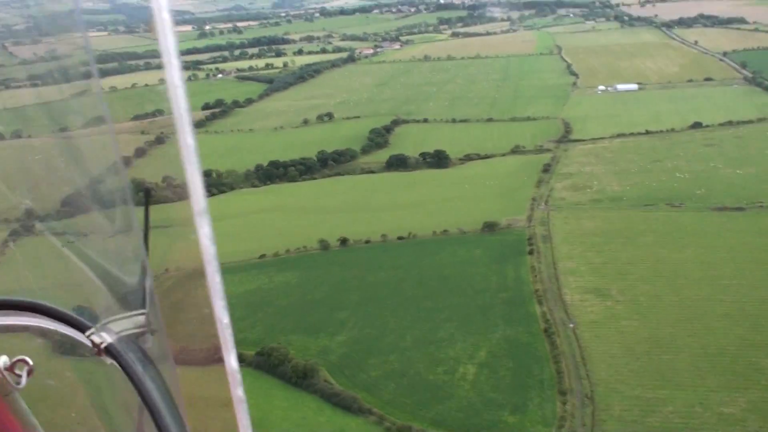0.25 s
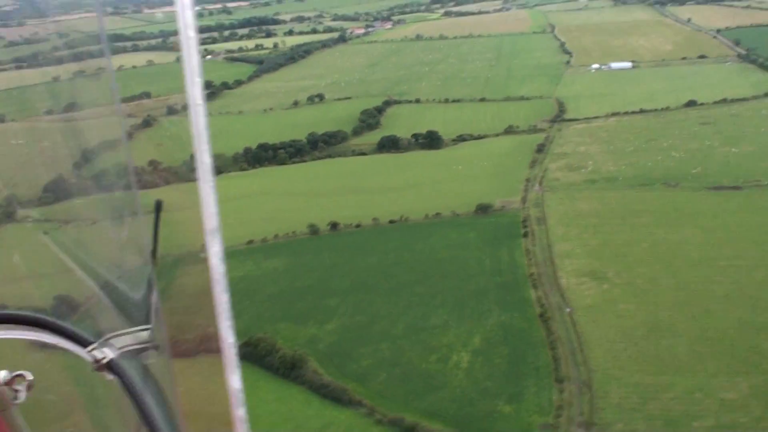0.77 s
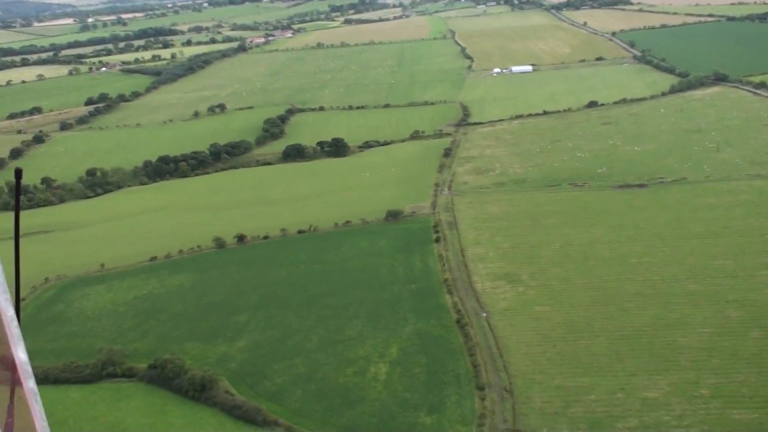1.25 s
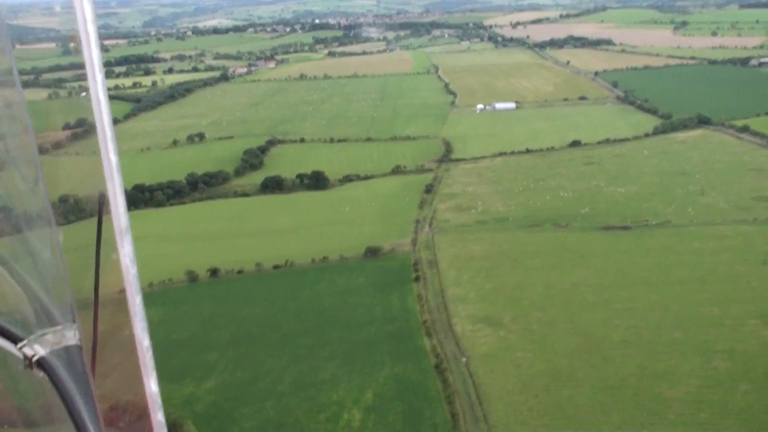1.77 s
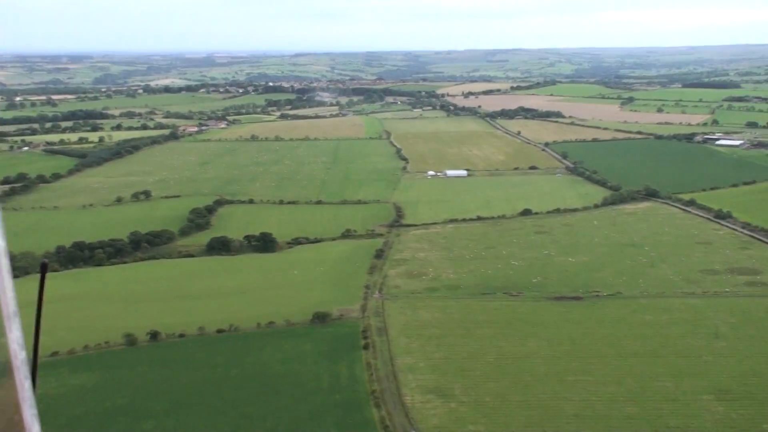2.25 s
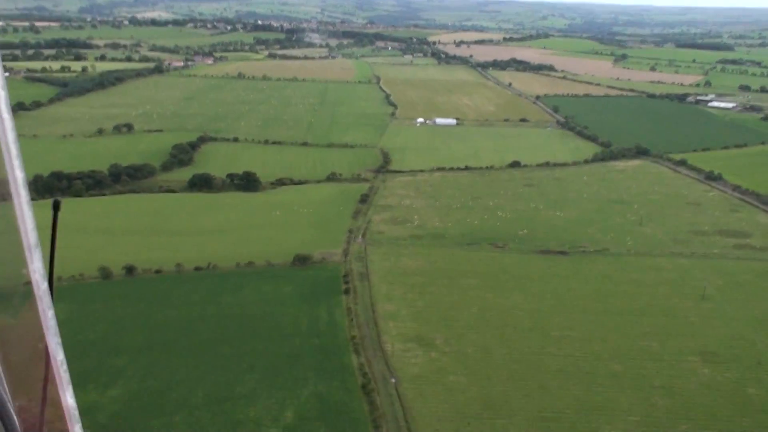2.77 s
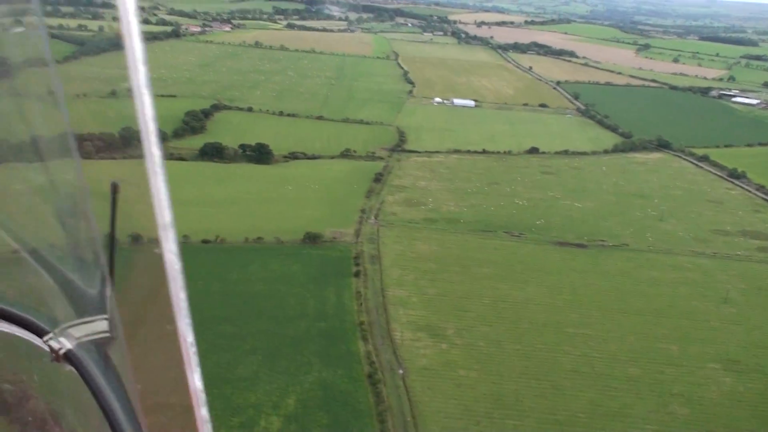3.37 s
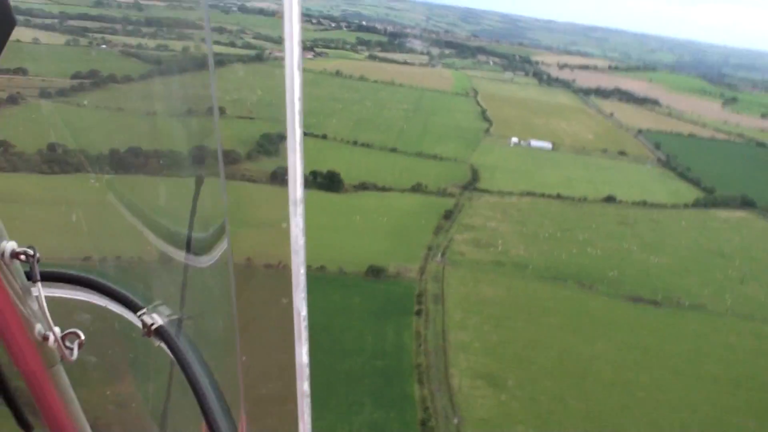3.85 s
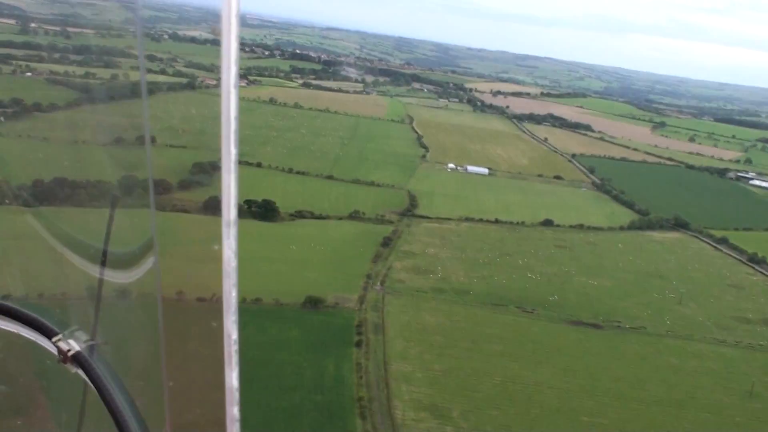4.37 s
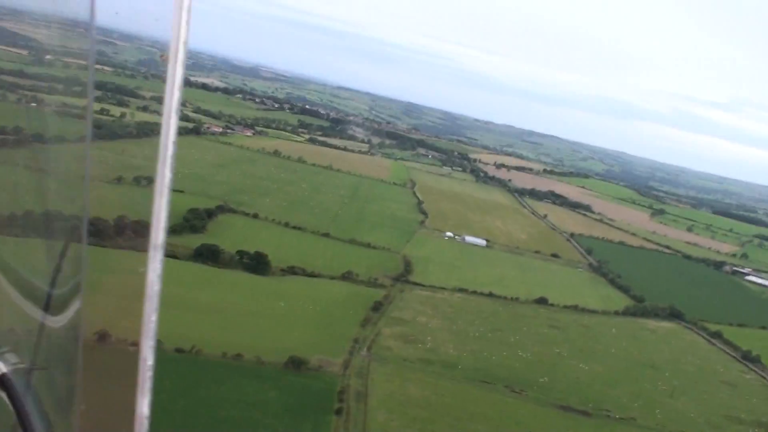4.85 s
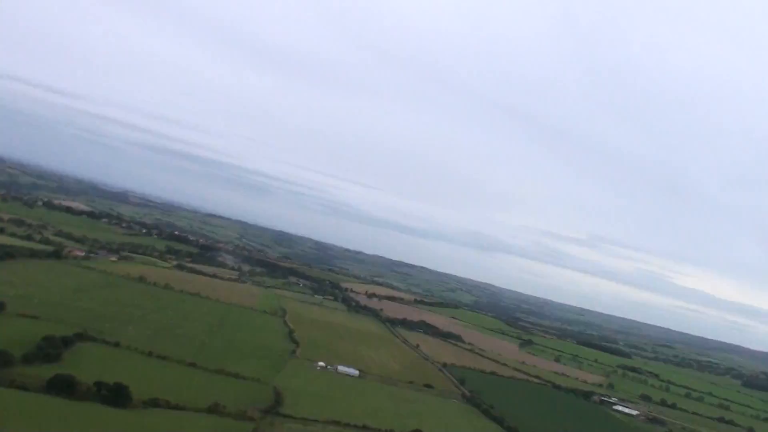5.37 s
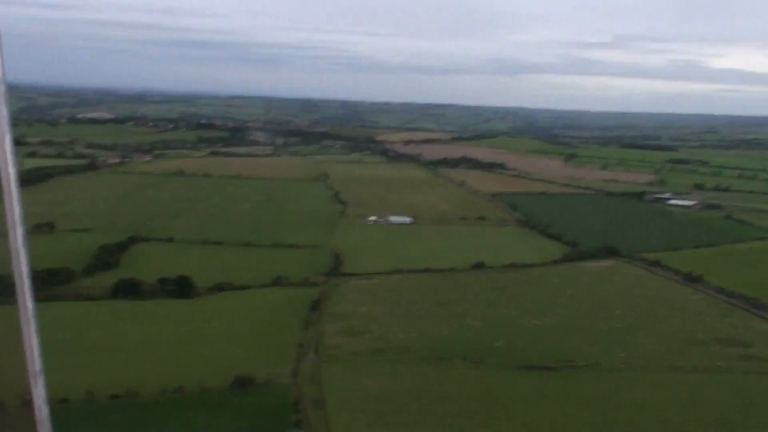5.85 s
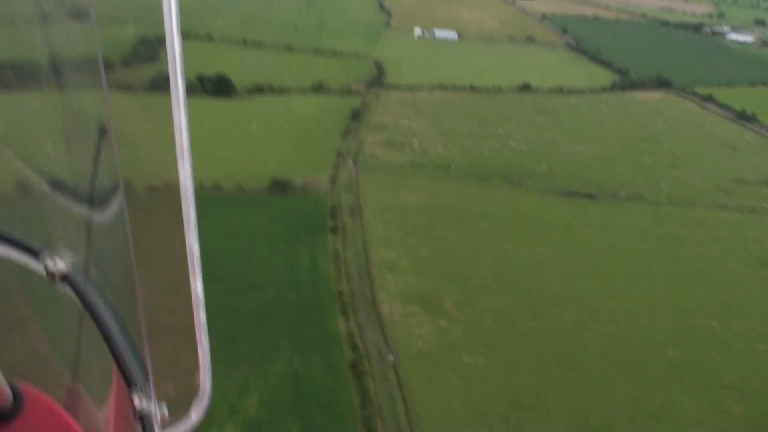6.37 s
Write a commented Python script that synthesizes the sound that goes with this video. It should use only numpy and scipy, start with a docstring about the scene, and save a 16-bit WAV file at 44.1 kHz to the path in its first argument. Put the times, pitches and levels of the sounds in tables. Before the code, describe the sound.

Harsh gusts swell and sputter across a camera's microphones in flight, with a steady small engine drone and propeller rush emerging between them.

```python
"""Open microlight in flight

Turbulence carried past the two microphone ports of a hand-held camera makes a rough roar that
swells as the air speeds up; vortex cracks, puffs and a strut's hollow tone ride on it.
In the lee of the windscreen the engine comes through: firing harmonics, casing resonances and
propeller rush. The capsules overload, and a bass cut turns the flat tops into spikes."""
import sys
import numpy as np
from scipy import signal
from scipy.fft import rfft, irfft, next_fast_len
from scipy.io import wavfile
from scipy.ndimage import map_coordinates

SR = 44100
rng = np.random.default_rng(int(sys.argv[2]) if len(sys.argv) > 2 else 0)


def to_wav(sig):
    """Store sig (one row per channel, or 1-D mono) as 16-bit WAV at the path in sys.argv[1].

    Samples outside -1..1 are clipped; the rate is SR.
    """
    pcm = np.clip(np.atleast_2d(sig), -1, 1) * 32767
    pcm = np.round(pcm).astype(np.int16)
    wavfile.write(sys.argv[1], SR, pcm.T)  # frames by channels


N = 291942

# Level of the engine as the camera turns, before the loss in fast air.
# Each row: time in seconds, level in dB.
ENGINE_LEVEL = [(0, 4), (3.15, -7), (3.31, -3), (4.5, 0), (5.6, 3.5), (6.3, -3)]
# Resonances of the engine casing and exhaust.
# Each row: centre in Hz, width in Hz, relative peak in dB.
CASING_MODES = [(1540.2, 58, 12), (1600, 230, 2), (2900, 270, -16), (3620, 410, -8.5), (4570, 130, -11)]
# Strength of the casing's ringing as the camera turns. Each row: time in seconds, level in dB.
RINGING_LEVEL = [(3.1, 5), (3.33, 1.5), (3.8, 1.5), (4.45, -2.5), (4.7, -0.5), (6.3, -2)]
# Spectrum of the rush of propeller and airframe. Each row: frequency in Hz, relative density in dB per Hz.
RUSH_SPECTRUM = [(60, -3), (500, -3), (1200, -17.5), (2500, -17.5), (6000, -29.5), (10500, -38),
                 (12000, -40.5), (16000, -42)]
# Speed of the air at the ports, as the camera swings in and out of the screen's lee.
# Each row: time in seconds, eddy rate in Hz.
AIRFLOW_SPEED = [(0, 304.6), (0.05, 370.3), (0.1, 284.6), (0.25, 316.4), (0.33, 265.2), (0.4, 152),
                 (0.56, 135.9), (0.77, 150.4), (0.88, 185.1), (0.93, 280), (1.14, 560.8), (1.3, 537),
                 (1.4, 420.2), (1.52, 400.8), (1.62, 265.3), (1.8, 234.5), (1.9, 195.2), (2.08, 326.4),
                 (2.35, 356.4), (2.54, 319.6), (2.66, 245), (2.84, 261.1), (2.9, 204.8), (2.95, 295.2),
                 (3.06, 279.7), (3.1, 140.1), (3.2, 111.9), (3.27, 99.95), (3.35, 111.6), (3.42, 87.95),
                 (3.7, 89.63), (4.0, 100), (4.2, 128.4), (4.37, 101.6), (4.65, 120.9), (4.85, 109.9),
                 (4.98, 159.9), (5.1, 160.1), (5.16, 220), (5.31, 250), (5.38, 365.7), (5.51, 328.6),
                 (5.55, 240.7), (5.63, 335.2), (5.72, 294.5), (5.87, 239.6), (5.95, 240), (6.0, 178.3),
                 (6.14, 166.2), (6.26, 121.9), (6.38, 108.2), (6.55, 158.1), (6.62, 150.3)]
# How squarely the ports face the flow. Each row: time in seconds, change of pressure in dB.
PORT_FACING = [(0, -0.5), (0.55, 4), (0.8, 6.5), (0.95, -1), (1.24, -4.5), (1.5, 1.5), (1.9, 1.5),
               (2.1, 1.5), (2.88, 3.5), (3.06, -3.5), (3.12, 7.5), (3.22, 4.5), (3.45, 0), (3.95, -2.5),
               (4.18, -1.5), (4.85, -0.5), (5.05, 2.5), (5.4, -2), (6.15, 5), (6.3, 3), (6.38, -2),
               (6.45, 3), (6.62, 3.5)]
# Vortex street behind a strut, whose note rises in gusts.
# Each row: time in seconds, note in Hz, level in dB over the turbulence.
STRUT_SHEDDING = [(0, 240, -12.5), (0.21, 230, -8.5), (0.45, 150, -15), (0.9, 200, -15.5), (1.04, 300, -7),
                  (1.15, 450, -17), (1.26, 640, -10), (1.36, 450, -11.5), (1.5, 380, -10), (1.75, 250, -22),
                  (2.15, 220, -12), (2.27, 225, -10.5), (2.35, 265, -8.5), (2.46, 235, -7),
                  (2.6, 200.2, -3), (2.72, 165, -3), (2.85, 180, -8.5), (3.4, 100, -15.5),
                  (4.9, 150, -16.5), (5.3, 319.9, -13.5), (5.55, 220, -23), (5.8, 170, -13),
                  (5.95, 205, -7), (6.1, 140, -18)]
# The hardest buffets, single vortices that hit the ports.
# Each row: time in seconds, crack drive in dB, trailing puff peak in dB.
BUFFET_HITS = [(0.416, 7, 5), (0.435, 0, 2), (0.459, 11, 9), (0.487, 10, 5), (0.509, 8, 0), (0.591, 5, 5),
               (0.624, 11, -2), (0.645, 7.5, 10), (0.655, 4, 7.5), (0.668, 12, 5), (0.684, 6, 2),
               (0.713, 4, 11), (0.793, 2, 8), (0.812, 9, 10), (0.833, 5, 4), (0.862, 5, 9), (1.667, 2, 6),
               (3.097, 5, 3.5), (3.116, 6, 0), (3.147, 6, -9), (3.193, 5, -2), (3.223, 3, 1.5),
               (3.245, -2, -20), (3.355, 4, 0), (4.096, 4, -4), (4.175, 5, -1), (4.302, 1, -15),
               (4.593, 6.5, -3.5), (4.880, 4, 2), (4.908, 5, -5), (4.927, 4, 0), (4.956, 3, 4.5),
               (4.984, 6, 7.5), (5.945, 5, 7), (6.121, 7, -4), (6.183, 8, 7), (6.227, 5.5, 0),
               (6.300, 8.5, -3), (6.336, 3, 1.5), (6.420, 8, -10), (6.477, 6, -2.5), (6.503, 7, 4),
               (6.529, 0, 2)]
# Turbulence spectrum for eddies passing at EDDY_HZ. Each row: frequency in Hz, relative density in dB per Hz.
TURBULENCE_SPECTRUM = [(15, -9), (50, 0), (100, 1.5), (160, 1), (300, -5), (700, -15), (1500, -27),
                       (4000, -44), (12000, -63.5)]
# Large eddies cover both ports, small ones only one.
# Each row: frequency in Hz, left-right correlation (no unit).
PORT_LIKENESS = [(50, 1), (150, 1), (400, 0.81), (900, 0.57), (3000, 0.032)]
# Overall tone of the sound: thin bass, and a brighter top above 11 kHz.
# Each row: frequency in Hz, gain in dB.
OVERALL_TONE = [(20, -45), (45, -40.5), (75, -29), (130, -24), (260, -20.5), (500, -17.5), (1000, -15.5),
                (1700, -14.5), (2800, -15), (5000, -15), (10500, -12), (11800, -9), (16000, -12)]
# Stereo width, set on the difference of the ports. Each row: frequency in Hz, gain in dB.
SIDE_GAIN = [(50, -6), (130, 1), (260, 3), (500, 4), (1000, 4.5), (2600, 3), (5000, -1), (10000, -4),
             (13000, -20)]
# Balance of the ports, the right being the livelier. Each row: frequency in Hz, left minus right in dB.
PORT_BALANCE = [(100, 0), (250, -0.5), (500, -1.2), (1200, -2.5), (4000, -2.5), (11000, -1)]

FIRING_HZ = 98.3  # mean firing rate of the engine at cruise
LEE_HZ, LEE_DB_PER_OCTAVE = 121, 7  # eddy rate in the lee; engine's loss as the air speeds up past it
EDDY_HZ = 200  # eddy rate at which the frozen pattern plays at its own pitch
# Pressure law: dB over the overload point in open air, eddy rate at the bend, sharpness of the bend
OPEN_STREAM_DB, OPEN_STREAM_HZ, KNEE = 7.5, 171, 4.64
FRONT_S, CORE_S = 0.00028, 0.003  # a vortex: time constants of its pressure flip and its fading
LULL_DB, LULL_LEAD_S, LULL_S = 6, 0.0035, 0.004  # slack before a buffet: depth, lead, half-length
TOP_HZ = 16400  # nothing is heard above this


def amp(db):
    """Level law: decibels to an amplitude ratio."""
    return 10 ** (np.asarray(db) / 20)


def unit(x):
    """Normalisation to an rms of 1."""
    return x / np.sqrt(np.mean(x ** 2) + 1e-20)


def along(points, hz):
    """Interpolation of (Hz, value) points on a logarithmic frequency axis."""
    point_hz, values = np.transpose(points)
    return np.interp(np.log(hz + 1), np.log(point_hz + 1), values)


def curves(rows):
    """Linear interpolation in time: one value per sample for each column after the first."""
    times, *columns = np.transpose(rows)
    return [np.interp(np.arange(N) / SR, times, column) for column in columns]


def wobble(rate):
    """Band-limited fluctuation: a smooth curve through random knots, rate of them a second."""
    knots = rng.standard_normal(int(N * rate / SR) + 4)
    return map_coordinates(knots, [np.arange(N) * rate / SR])


def filtered(x, response):
    """Linear filtering: the spectrum is multiplied by a complex response of frequency."""
    size = 2 * next_fast_len(N // 2 + SR // 4)
    hz = np.fft.rfftfreq(size, 1 / SR)
    return irfft(rfft(x, size) * response(hz), size)[..., :N]


def coloured(x, points):
    """Minimum-phase filtering: folding the cepstrum of the (Hz, dB) gain makes it causal."""
    def response(hz):
        cepstrum = irfft(np.log(amp(along(points, hz))))
        half = len(cepstrum) // 2
        folded = np.r_[cepstrum[0], 2 * cepstrum[1:half]]
        return np.exp(rfft(folded, len(cepstrum)))
    return filtered(x, response)


def airflow():
    """Dynamic pressure: it grows with speed squared, then levels off; gives Hz and dB over overload."""
    eddy_hz, = curves(AIRFLOW_SPEED)
    facing_db, = curves(PORT_FACING)
    shelter_db = 40 / KNEE * np.log10(1 + (OPEN_STREAM_HZ / eddy_hz) ** KNEE)
    return eddy_hz, OPEN_STREAM_DB - shelter_db + facing_db


def lulls():
    """Momentary stagnation: share of speed and pressure left as the flow slackens at each buffet."""
    t = np.arange(N) / SR
    slack = sum(np.exp(-((t - s + LULL_LEAD_S) / LULL_S) ** 2) for s, _, _ in BUFFET_HITS)
    return amp(-LULL_DB * slack)


def engine(drone_db=-19, clatter_db=-27.5, rush_db=-22, throb=0.25, waver_db=2.7,
           unsteady=0.009257, drift_s=0.00007):
    """Periodic and resonant sound: firing harmonics and a struck casing over propeller rush."""
    eddy_hz, _ = airflow()
    lee_loss_db = LEE_DB_PER_OCTAVE * np.log2(np.maximum(eddy_hz / LEE_HZ, 1))
    level_db = curves(ENGINE_LEVEL)[0] - lee_loss_db
    phase = 2 * np.pi * np.cumsum(FIRING_HZ * (1 + unsteady * wobble(9))) / SR
    drone = unit(sum(np.sin(k * phase) / k for k in range(1, 7)))

    def casing(hz):
        return sum(amp(db) * centre * width / (centre ** 2 - hz ** 2 + 1j * hz * width)
                   for centre, width, db in CASING_MODES)

    # noise that throbs at the firing rate excites the casing
    blows = (1 + throb * np.cos(phase)) * rng.standard_normal(N)
    # small shifts in time make the ring waver in pitch
    drifted = np.arange(N) + drift_s * SR * wobble(30)
    ring = map_coordinates(filtered(blows, casing), [drifted], mode="reflect")
    clatter = unit(ring) * amp(curves(RINGING_LEVEL)[0] + waver_db * wobble(7))
    # a shared part makes the two ports partly alike
    rush_noise = rng.standard_normal((2, N)) + 0.48 * rng.standard_normal(N)
    rush = unit(coloured(rush_noise, RUSH_SPECTRUM))
    return amp(level_db) * (amp(drone_db) * drone + amp(clatter_db) * clatter + amp(rush_db) * rush)


def vortex_street(wander=0.11, swell_db=3.0):
    """Vortex shedding: nearly regular vortices from a strut give a hollow, unsteady tone."""
    note_hz, _ = curves(STRUT_SHEDDING)
    phase = 2 * np.pi * np.cumsum(note_hz * (1 + wander * wobble(90))) / SR
    return unit(np.sin(phase) * amp(swell_db * wobble(40)))


def buffets(stray_rate=80, stray_db=-5, scatter_db=2, rise=0.0016, low_hz=450, high_hz=1000):
    """Vortex-core pressure: it flips in a crack; puffs trail the hardest hits, strays add flutter."""
    t = np.arange(N) / SR
    hits, puffs = np.zeros((2, N))
    for s, crack_db, puff_db in BUFFET_HITS:
        hits[round(s * SR)] += amp(crack_db)
        # each puff peaks one rise time (s) after its hit
        age = np.clip((t - s) / rise, 0, 20)
        puffs += amp(puff_db) * age * np.exp(1 - age)
    # strays: random moments, stray_rate a second on average, of random sign and size
    _, pressure_db = airflow()
    chance, size = rng.random(N), rng.standard_normal(N)
    spin = np.sign(rng.standard_normal(N))
    hits += (chance < stray_rate / SR) * spin * amp(pressure_db + stray_db + scatter_db * size)
    lag = np.arange(-SR // 20, SR // 20 + 1) / SR
    core = -np.tanh(lag / FRONT_S) * np.exp(-np.abs(lag) / CORE_S)
    cracks = signal.fftconvolve(hits, core, mode="same")

    def band(hz):
        return hz ** 2 / (hz ** 2 + low_hz ** 2) / (1 + (hz / high_hz) ** 4.4)

    swirl = rng.standard_normal((2, N)) + rng.standard_normal(N)
    # keeping only the phase makes swings even in size but not in pace
    swings = np.cos(np.angle(signal.hilbert(filtered(swirl, band))))
    return cracks + puffs * swings


def slipstream(gust_db=-0.06, surge=.04, lurch=.15, small_hz=450, small_db=3, tatter_db=1.62):
    """Frozen turbulence: a fixed eddy pattern is carried past, and faster air raises its frequencies."""
    eddy_hz, pressure_db = airflow()
    gust, stall = wobble(26), lulls()
    # the air moves in lurches, which steepen some eddies into cracks
    pace = np.exp(surge * gust + lurch * wobble(450) - lurch ** 2 / 2)
    travel = np.cumsum(stall * eddy_hz * pace) / EDDY_HZ
    size = 2 * next_fast_len(N)
    hz = np.fft.rfftfreq(size, 1 / SR)
    # the mixing angle sets the correlation of the ports
    angle = np.arccos(np.clip(along(PORT_LIKENESS, hz), -1, 1)) / 2
    noise = rfft(rng.standard_normal((2, size))) * amp(along(TURBULENCE_SPECTRUM, hz))
    common, apart = noise * [np.cos(angle), np.sin(angle)]
    eddies = np.array([common + apart, common - apart])
    # small eddies ride on the large ones, raised by small_db
    large = 1 / (1 + (hz / small_hz) ** 4)
    field = irfft(eddies * (large + amp(small_db) * (1 - large)))
    ports = np.array([map_coordinates(port, [travel], mode="wrap") for port in field])
    # slow air in the wake of the screen arrives in tatters
    flutter_db = tatter_db * EDDY_HZ / eddy_hz * wobble(70)
    street = amp(curves(STRUT_SHEDDING)[1])
    flow = (unit(ports) + street * vortex_street()) / np.hypot(1, street)
    return stall * flow * amp(pressure_db + gust_db * gust + flutter_db)


def scene():
    """Superposition of pressures at the two ports, 1 being the overload point."""
    return engine() + buffets() + slipstream()


def gain_control(x, ceiling_db=-19.5, memory=0.18, makeup_db=0.7):
    """Feed-forward compression: gain follows recent power slowly, so a gust after a calm is louder."""
    keep = np.exp(-1 / (memory * SR))  # memory in s
    power = np.mean(x ** 2, axis=0) / amp(ceiling_db) ** 2
    load = signal.lfilter([1 - keep], [1, -keep], power, zi=[1])[0]
    return amp(makeup_db) * x / (1 + load ** 2) ** (1 / 4)


def record(dry, hardness=16, give=0.014, hiss_db=-51.0, hiss_hz=2500, ripple_db=-16, ripple_hz=600):
    """Saturation and bass cut: the capsules overload, and flat tops become decaying spikes."""
    limited = dry / (1 + np.abs(dry) ** hardness) ** (1 / hardness)
    clipped = give * dry + (1 - give) * limited
    # fine ripple still rides on the flat tops
    ripple = filtered(dry - clipped, lambda hz: 1j * hz / (ripple_hz + 1j * hz))
    clipped = clipped + amp(ripple_db) * ripple
    hiss_noise = filtered(rng.standard_normal((2, N)), lambda hz: 1 / (1 + 1j * hz / hiss_hz))
    hiss = amp(hiss_db) * unit(hiss_noise)  # level ahead of the overall tone
    left, right = coloured(clipped + hiss, OVERALL_TONE)
    mid = (left + right) / 2
    side = coloured((left - right) / 2, SIDE_GAIN)
    # each port takes half of the left-right difference
    pair = filtered(np.array([mid + side, mid - side]),
                    lambda hz: amp(np.outer([.5, -.5], along(PORT_BALANCE, hz))))
    pair = gain_control(pair)
    # the preamplifier rounds off the tallest spikes
    rounded = pair / (1 + (pair / amp(-7.5)) ** 4) ** (1 / 4)
    return filtered(rounded, lambda hz: hz < TOP_HZ)


dry = scene()
out = record(dry)
to_wav(out)
```